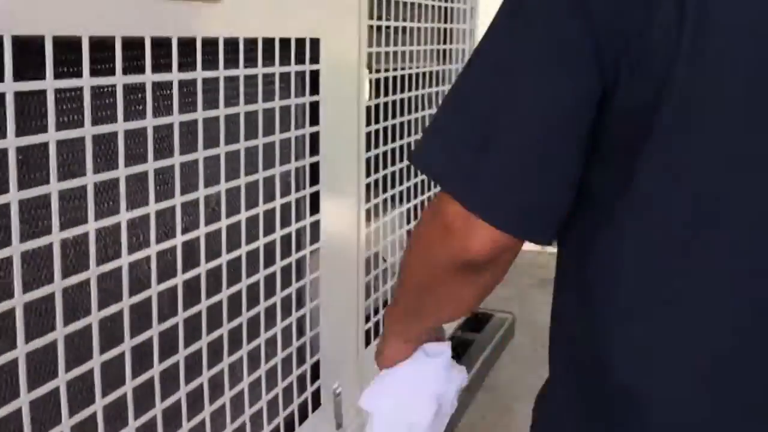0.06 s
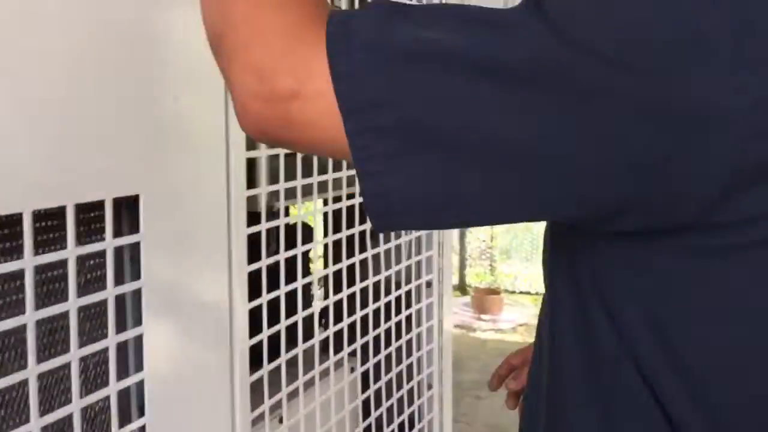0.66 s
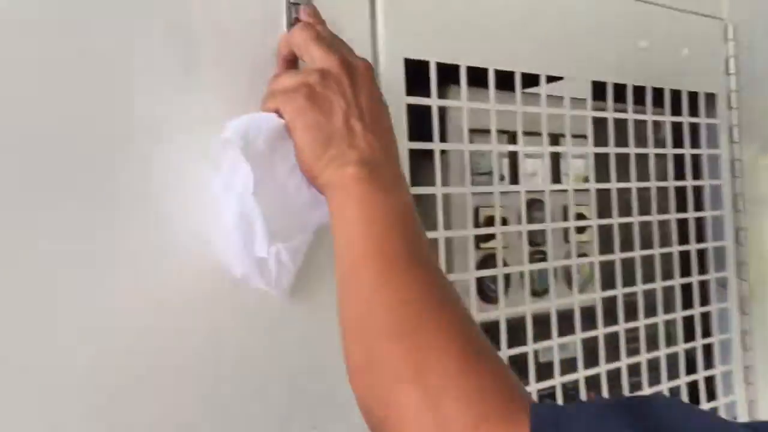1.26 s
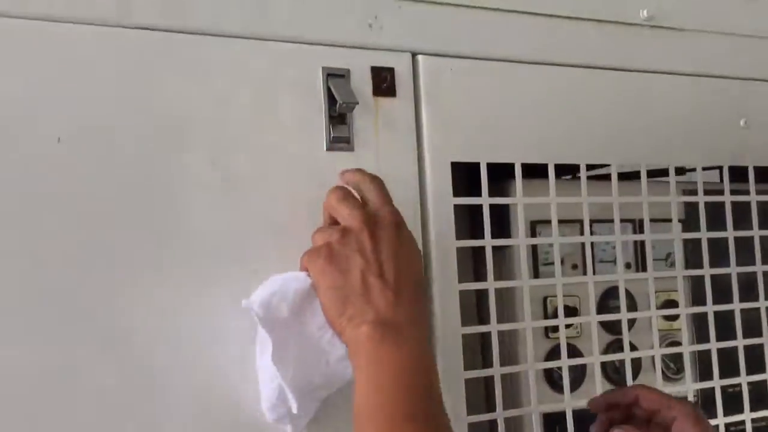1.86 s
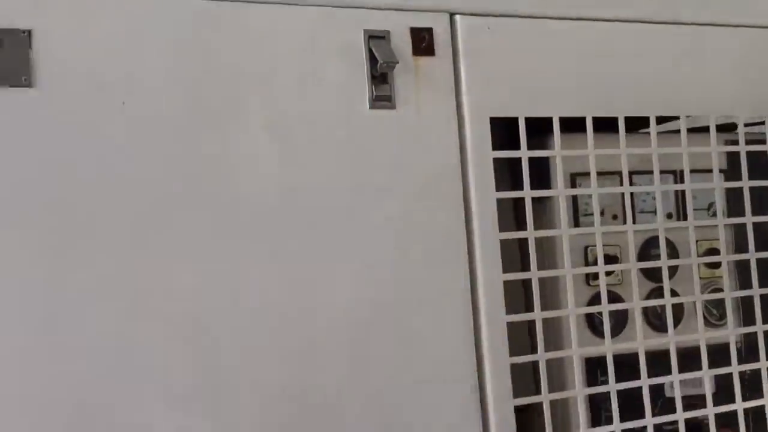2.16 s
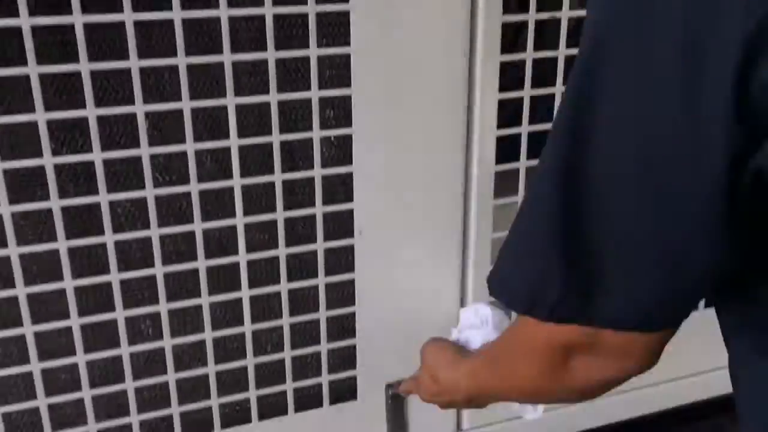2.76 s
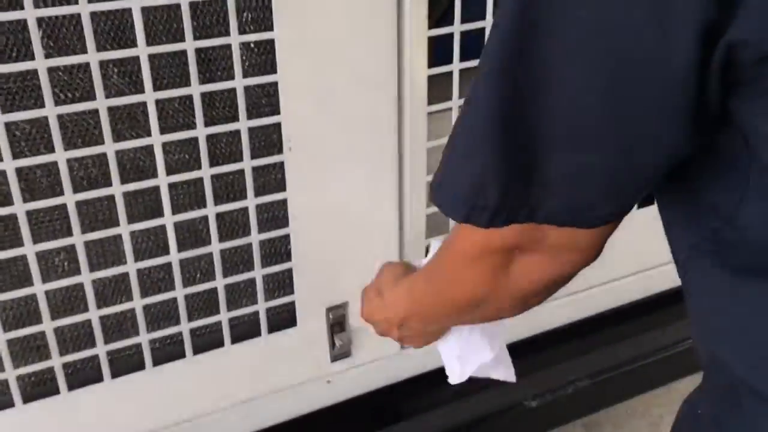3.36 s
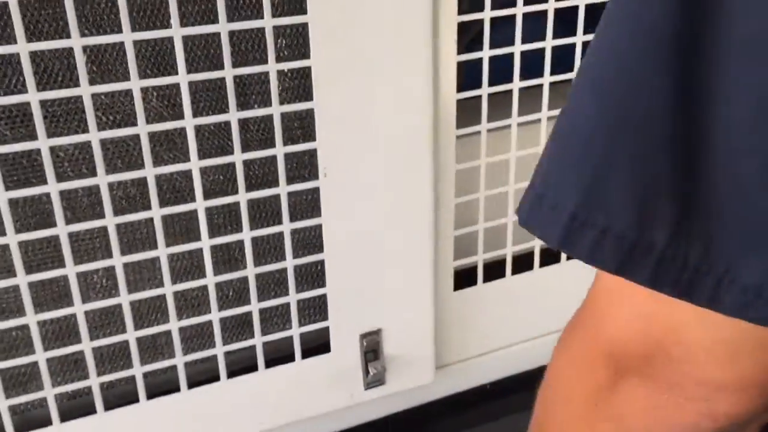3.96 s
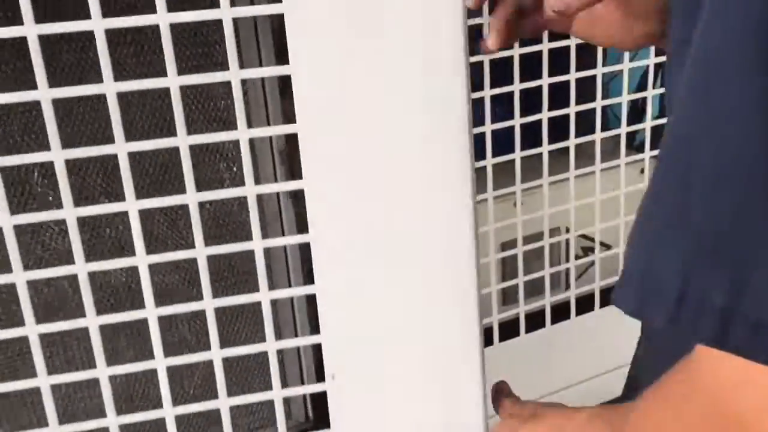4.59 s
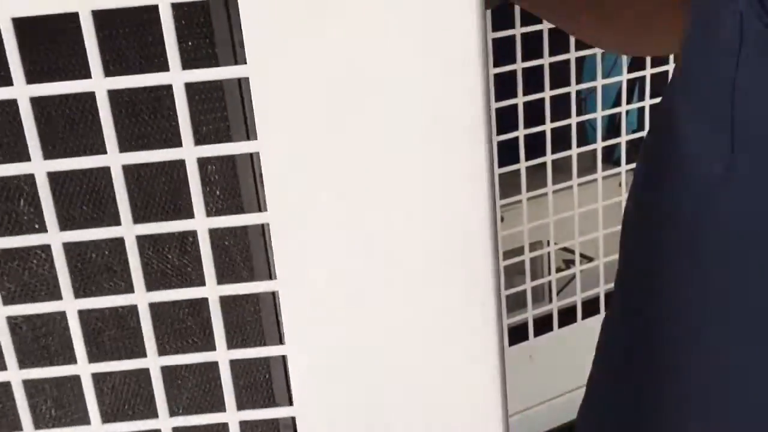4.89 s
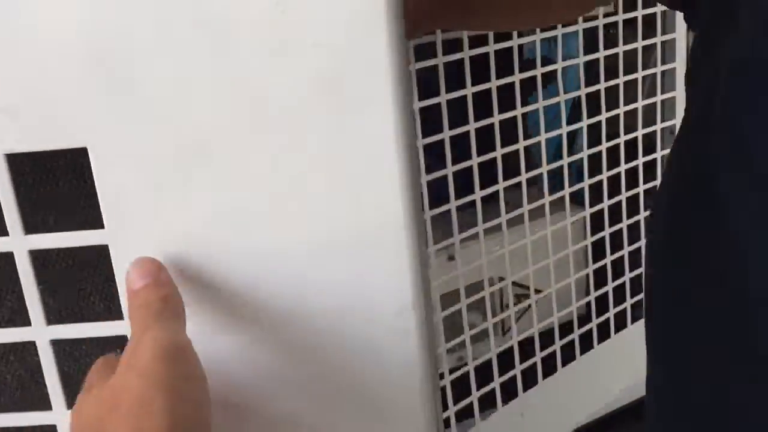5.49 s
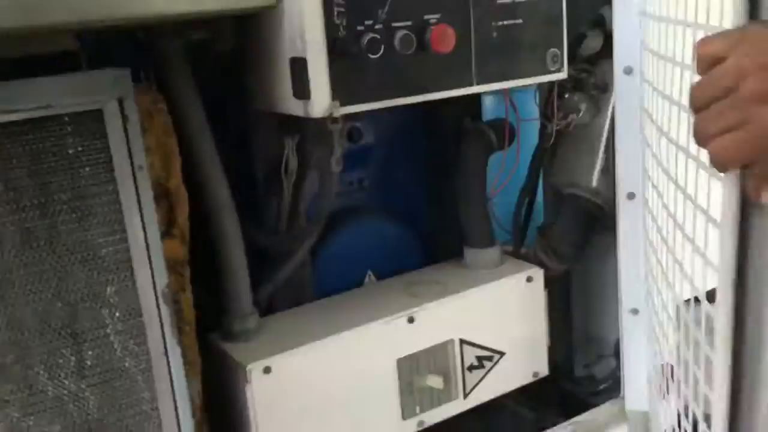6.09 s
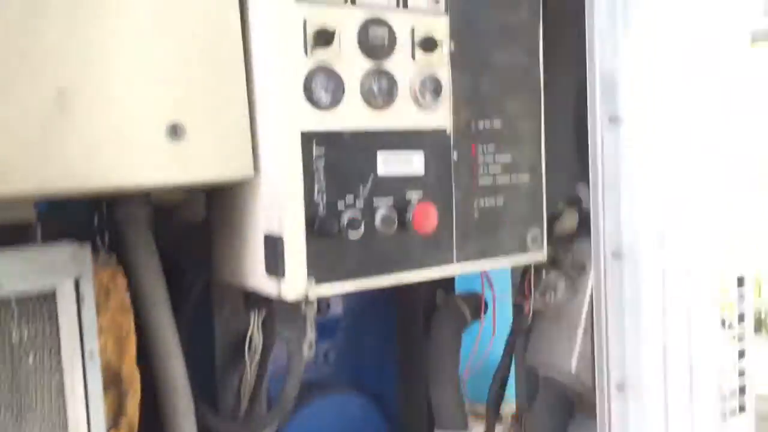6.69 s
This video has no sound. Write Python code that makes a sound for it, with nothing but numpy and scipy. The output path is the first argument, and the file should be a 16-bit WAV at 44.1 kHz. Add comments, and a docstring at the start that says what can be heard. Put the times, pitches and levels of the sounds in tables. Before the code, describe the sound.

A large air-conditioning unit hums while two metal latches clack loudly and its sheet-steel door scrapes and knocks open.

```python
"""Opening a steel machine door

Outdoors under a canopy, a big air-conditioning unit hums low. Thin, high tones, probably insects, waver
in the background. Two spring latches on the unit's sheet-steel door are popped: each snaps open, hits
its stop and clacks back, and the door booms and rings. Then the door is dragged out of its frame and
swung aside, while shoes scuff and cloth rustles."""
import sys
import numpy as np
from scipy import signal
from scipy.fft import rfft, irfft
from scipy.io import wavfile
from scipy.ndimage import uniform_filter1d

SR = 44100
rng = np.random.default_rng(int(sys.argv[2]) if len(sys.argv) > 2 else 0)


def unload_wav(signal):
    """Save mono or channel-first audio to the path in sys.argv[1] as 16-bit WAV at rate SR, clipped to [-1, 1]."""
    wavfile.write(
        sys.argv[1],
        SR,
        np.round(np.clip(np.atleast_2d(signal).T, -1, 1) * 32767).astype(np.int16),
    )


N = 297234


def amp(db):
    """Turns decibels into a gain."""
    return 10 ** (np.asarray(db) / 20)


def unit(x):
    """Scales a signal to an average (rms) level of 1."""
    return x / np.sqrt(np.mean(x ** 2) + 1e-20)


def read(points, hz, column=1):
    """One column of a pitch table, filled in between its rows."""
    table = np.array(points, float)
    return np.interp(np.log(hz + 1), np.log(table[:, 0]), table[:, column])


def curve(rows):
    """The columns of a time table at every sample."""
    times, *columns = np.transpose(rows)
    return np.squeeze([np.interp(np.arange(N) / SR, times, column) for column in columns])


def add(mix, start_s, sound):
    """Mixes a sound in at a given time."""
    part = mix[max(round(start_s * SR), 0):][:len(sound)]
    part += sound[:len(part)]


def peak(hz, centre_hz, db, octaves=0.41):
    """A broad hill in the spectrum, in dB."""
    return db * np.exp(-(np.log2((hz + 1) / centre_hz) / octaves) ** 2)


def colour(x, points, peak_hz=1000, peak_db=0):
    """Shapes a signal's lows and highs from a table, with an optional broad peak."""
    hz = np.fft.rfftfreq(len(x), 1 / SR)
    return unit(irfft(rfft(x) * amp(read(points, hz) + peak(hz, peak_hz, peak_db)), len(x)))


def lowpass(x, top_hz, order):
    """Keeps the lows; a higher order cuts more steeply."""
    return signal.sosfilt(signal.butter(order, top_hz, fs=SR, output="sos"), x)


def resonate(x, hz, width_hz):
    """Lets a signal ring around one pitch."""
    r = np.exp(-np.pi * width_hz / SR)
    return 2 * signal.lfilter([1 - r], [1, -r * np.exp(2j * np.pi * hz / SR)], x).real


def band(size, hz, width_hz):
    """Noise gathered around one pitch."""
    f = np.fft.rfftfreq(size, 1 / SR)
    return unit(irfft(rfft(rng.standard_normal(size)) / (1 + ((f - hz) / (width_hz * .78)) ** 2), size))


def wander(rate_hz):
    """A smooth random drift around zero."""
    f = np.fft.rfftfreq(N, 1 / SR)
    return unit(irfft(rfft(rng.standard_normal(N)) * np.exp(-(f / rate_hz) ** 2) * (f > 0), N))


def tone(hz):
    """A pure tone that follows a pitch curve."""
    return unit(np.sin(2 * np.pi * np.cumsum(hz) / SR))


def dying(t60):
    """A fade 1.5 s long; t60 is the seconds it takes to fall by 60 dB."""
    return np.exp(-np.log(1000) * np.arange(3 * SR // 2) / SR / t60)


# The sound of the machine and the outdoor air: pitch_hz, level_db
AIR_COLOUR = [(20, -37), (40, -14), (76, 0), (125, -7), (220, -12.5), (400, -21.5), (560, -25.5),
              (1300, -30), (1880, -27), (2150, -29), (2900, -35.5), (3250, -38.5), (3800, -38),
              (4700, -46.5), (8000, -52.5), (15500, -61.5)]
# How the low hum swells: time_s, gain_db
HUM_SWELL = [(0, 2), (.8, 1), (1.3, -1.5), (1.9, -1.5), (3.1, 1), (4.7, 2.5), (5.7, 6), (6.1, 2)]


def hum(air_db=-42.5, hum_top_hz=300):
    """The machine's low hum swells and sinks under a steady, soft hiss."""
    air = amp(air_db) * colour(rng.standard_normal(N), AIR_COLOUR)
    low = lowpass(air, hum_top_hz, order=2)
    hiss = air - low
    return low * amp(curve(HUM_SWELL)) + hiss


# Where the machine whirs: pitch_hz, width_hz, level_db
WHIRS = [(950, 80, -68), (1900, 110, -58.5), (2873, 110, -68)]


def whir(waver_db=2):
    """The machine's resonances whir unevenly, each a narrow band of noise."""
    return sum(amp(db + waver_db * wander(8)) * band(N, hz, width) for hz, width, db in WHIRS)


# Thin, high tones in the outdoor background, probably insects: pitch_hz, level_db
HIGH_TONES = [(1815, -63.5), (3505, -69), (5216, -85.5), (6417, -86.5)]
# How they swell together: time_s, gain_db
HIGH_TONE_SWELL = [(0, -7), (1.1, 2), (2.35, -6), (2.6, 3.5), (4.9, 0.5), (5.1, 2), (6.7, -25)]


def high_tones(pitch_jitter=.0025, waver_db=1.66):
    """Thin, high background tones, probably insects, waver in pitch and loudness."""
    out = np.zeros(N)
    for hz, db in HIGH_TONES:
        level = amp(db + waver_db * (wander(25) + wander(4.4)))
        out += level * tone(hz * (1 + pitch_jitter * wander(40)))
    return out * amp(curve(HIGH_TONE_SWELL))


# The path of the machine's low drone: time_s, pitch_hz, level_db
DRONE = [(0, 156, -47), (.3, 154.2, -43.5), (.5, 140.2, -54.5), (.9, 141.4, -66), (1.2, 142, -75)]


def drone(waver_db=2):
    """A low tone from the machine sags and fades."""
    hz, db = curve(DRONE)
    return amp(db + waver_db * wander(18)) * tone(hz)


def friction(points, slips_per_s, spread_db, clump_db, ring_db, ring_t60, slip_t60=0.0044):
    """Rubbing is many tiny, uneven slips that come in clumps, each with a soft ring after it."""
    size_db = spread_db * np.minimum(rng.exponential(1, N), 4) + clump_db * wander(51)
    size = amp(size_db) * rng.standard_normal(N)
    slips = size * (rng.random(N) < slips_per_s / SR)
    fades = dying(slip_t60), dying(ring_t60)
    burst, ring = (unit(fade * rng.standard_normal(len(fade))) for fade in fades)
    return colour(signal.fftconvolve(slips, burst + amp(ring_db) * ring)[:N], points)


def stroke(start_s, length_s, rise_s, fade_db_per_s):
    """The loudness of one rub: it rises, holds, then fades."""
    t = np.maximum(np.arange(N) / SR - start_s, 0)
    return np.minimum(t / rise_s, 1) * amp(-fade_db_per_s * np.maximum(t - length_s, 0))


# Each sweep of sleeve or rag: start_s, length_s, level_db
RUSTLES = [(0, .14, -57), (0.405, 0.089, -51.5), (0.724, 0.1, -61), (.87, .21, -56), (4.21, 0.18, -46.5),
           (4.439, 0.054, -41.5), (4.663, 0.027, -50.5), (4.778, 0.034, -48.5), (5.336, 0.086, -48.5),
           (5.587, 0.029, -38), (5.782, 0.023, -48.5), (5.97, 0.18, -48.5), (6.394, 0.054, -54),
           (6.604, 0.024, -45.5)]
# The sound of rubbing cloth: pitch_hz, level_db
RUSTLE_COLOUR = [(1000, 9.5), (3500, 6), (7500, 3.5), (10400, -1), (12500, 1), (15500, -9)]


def cloth(rise_s=.018, fade_db_per_s=182):
    """Sleeve and rag rustle with each move of the arm."""
    level = sum(amp(db) * stroke(start, length, rise_s, fade_db_per_s) for start, length, db in RUSTLES)
    rustle = friction(RUSTLE_COLOUR, slips_per_s=1400, spread_db=-1, clump_db=3,
                      ring_db=-1, ring_t60=0.28)
    return level * rustle


# Each scuff of a shoe on concrete: start_s, length_s, level_db, rasp_hz
SCUFFS = [(0.04, 0.044, -46, 2900), (0.386, .08, -49, 1380), (0.704, .06, -52.5, 2210),
          (5.963, 0.036, -45, 3160), (6.147, 0.046, -46, 2500), (6.303, 0.059, -38, 2000),
          (6.608, 0.046, -37.5, 1750)]
# The sound of grit under a shoe: pitch_hz, level_db
GRIT_COLOUR = [(150, -9), (550, -2.5), (1100, 5), (1500, -5.5), (2200, 0), (3200, 3), (5500, -6),
               (8000, -26), (15500, -28)]


def shoes(rasp_db=2, rasp_width_hz=1200, rise_s=0.02, fade_db_per_s=157):
    """Soles grind over grit, each scuff with its own rasp."""
    grit = friction(GRIT_COLOUR, slips_per_s=2500, spread_db=4, clump_db=3.5,
                    ring_db=4.5, ring_t60=0.097)
    out = np.zeros(N)
    for start_s, length_s, db, hz in SCUFFS:
        rasp = unit(resonate(resonate(grit, hz, rasp_width_hz), hz, rasp_width_hz))
        level = amp(db) * stroke(start_s, length_s, rise_s, fade_db_per_s)
        out += level * unit(grit + amp(rasp_db) * rasp)
    return out


# The sound of steel hitting steel: pitch_hz, level_db
CRACK_COLOUR = [(150, -25), (900, -3.5), (2000, -4), (3200, -1), (6500, 0), (8500, -1.5), (10400, -5),
                (11800, -0.5), (15500, -4)]


def crack(t60, peak_hz, peak_db, tilt_db_per_octave=0):
    """Small steel parts meet in a short, bright burst of noise."""
    fade = dying(t60)[:SR // 5]
    tilted = [(hz, db + tilt_db_per_octave * np.log2(hz)) for hz, db in CRACK_COLOUR]
    return fade * colour(rng.standard_normal(len(fade)), tilted, peak_hz, peak_db)


# The steel's ring and its tail under the canopy: pitch_hz, level_db, ring_t60_s, tail_t60_s
STEEL_RING = [(70, -28, .4, 1.3), (140, -11.5, 0.52, 1.3), (287, -5, 0.95, 0.73), (470, -10, 0.15, 2.1),
              (930, -2.5, 0.4, 1.2), (1900, -5.5, 0.34, 1.1), (2800, -2.5, 0.26, .75),
              (4000, -3, 0.25, .65), (6400, -7.5, 0.09, 0.75), (7240, -8, 0.1, 0.53), (9500, -8, 0.13, 0.5),
              (10300, -14, 0.098, 0.38), (11400, -13.5, 0.14, 0.57), (15500, -22.5, .12, .42)]


def steel(clang_hz, clang_db, tilt_db_per_octave=0, tail_db=-17, uneven_db=2.5):
    """Sheet steel rings at so many close pitches that they blur into noise, with a softer tail."""
    hz, t, noise = signal.stft(rng.standard_normal(SR), SR, nperseg=512, noverlap=384)
    ripple = uneven_db * rng.standard_normal(len(hz)) * np.minimum(hz / 2000, 1)
    tilt = tilt_db_per_octave * np.log2(np.maximum(hz, 500))
    shape = unit(amp(read(STEEL_RING, hz) + ripple + peak(hz, clang_hz, clang_db) + tilt))
    ring, tail = (np.exp(-np.log(1000) * t / read(STEEL_RING, hz, k)[:, None]) for k in (2, 3))
    ringing = noise * shape[:, None] * np.hypot(ring, amp(tail_db) * tail)
    return signal.istft(ringing, SR, nperseg=512, noverlap=384)[1][:SR]


# The door's strongest notes when hit at each latch: pitch_hz, upper_latch_db, lower_latch_db
DOOR_NOTES = [(131.8, -8, -12), (188.8, -10, -9), (206.3, -7, -7), (248, -10, -11), (269.3, -1, -13.5),
              (282, -2, -6), (298, -7, -12.5), (330, -5, -10.5), (443, 0, -28), (490, -1.5, -24),
              (548, -0.5, -16), (614, 1, -9.5), (645, -10, -10), (685, -2.5, -2.5), (790, -13, -12.5),
              (870, -5.5, -7), (974, -3, 1.5), (1057, -9, -15), (1154, -0.5, -5), (1223, -13.5, -4),
              (1510, -5.5, -12.5), (1705, -3.5, -14.5), (1932, -1, -7.5), (2030, -3.5, 1), (3440, -4, -2.5),
              (3610, -7.5, 1), (4220, -4, -6), (4500, -14.5, -1), (5670, -5.5, -17.5)]


def door_boom(spot, spread_db=1, swell_s=0.00067):
    """The door is hit between the upper latch (spot 0) and the lower (1); high notes die sooner."""
    t = np.arange(len(dying(1))) / SR
    notes = np.zeros(len(t))
    for hz, upper_db, lower_db in DOOR_NOTES:
        db = np.interp(spot, [0, 1], [upper_db, lower_db]) + spread_db * rng.standard_normal()
        t60 = min(1.1, .45 * (1000 / hz) ** .55)
        notes += amp(db) * dying(t60) * np.sin(2 * np.pi * (hz * t + rng.random()))
    return notes * (1 - np.exp(-t / swell_s))


# Small knocks of the door and its parts:
# start_s, level_db, boom_db, tilt_db_per_octave, clang_hz, clang_db
KNOCKS = [(0.094, -48, -20, -8, 3680, 20), (0.149, -45.5, -22, -6.5, 2130, 15.5),
          (.7245, -44, -12, -7, 1870, 11.5), (0.9132, -43.5, -24, -2, 9400, 10),
          (.9290, -47, -18, 15, 9000, 8), (.9990, -47.5, -18, -5, 9060, 11),
          (3.6780, -40.5, -20.5, -8, 9000, 7), (4.3022, -42, -10, -3, 4000, 11),
          (4.328, -24.5, -19, 1, 12800, 6.5), (4.3654, -25, -16, 5.5, 12200, -7),
          (4.3690, -29.5, 5, -5.5, 1950, 15.5), (4.445, -39, -16, 4, 9000, 11),
          (4.481, -34, -9, 0, 1200, 6), (4.505, -41, -17, -10, 2100, 24), (4.6847, -46, -11, 7, 6000, 7),
          (4.8165, -46, 8, 2, 9000, 9), (5.3732, -37.5, 5, -3, 902, 13), (5.4259, -27.5, -19, 4, 9100, 5),
          (5.467, -34.5, -16, 4, 8900, 8), (5.599, -27, -8, 2, 7000, -1.5),
          (5.719, -42, -24, -4.5, 4150, 8), (6.309, -49, -20, -3, 2180, 14)]


def knocks(ring_db=-6, tick_db=7, door_db=-21, tick_t60=0.031):
    """Each light touch makes a short tick, with a little ring and boom."""
    out, boom = np.zeros(N), door_boom(spot=0.97)
    for start_s, db, boom_db, tilt, clang_hz, clang_db in KNOCKS:
        add(out, start_s, amp(db + tick_db) * crack(tick_t60, clang_hz, clang_db, tilt))
        # a brighter tick comes from a smaller part, which rings the sheet less
        add(out, start_s, amp(db + ring_db - 0.35 * tilt) * steel(clang_hz, clang_db, tilt))
        add(out, start_s, amp(db + boom_db + door_db) * boom)
    return out


# Each blow of a latch: start_s, spot (0 to 1), level_db, boom_db, clang_hz, clang_db, crack_db, ring_db
LATCH_BLOWS = [(1.5442, 0.24, -21.5, -9, 3500, -7.5, -7, -14.5), (1.5475, 0.054, -7.5, 2, 3080, 1, 2.5, -2),
               (1.5886, 0.52, -13, 6, 2800, 3.5, 1, -11), (1.811, 0.68, -10.5, 5.5, 2900, -5, 5.5, -2.5),
               (3.2360, 0.85, -18, -17, 3540, -9.5, 5.5, -9.5), (3.2379, 0.91, -9, 4.5, 980, 3.5, 6.5, -11),
               (3.2478, 0.89, -15, -8.5, 4100, 13, 10.5, -13.5),
               (3.2716, 0.25, -15, -2.5, 3200, 0.5, 5, 1.5), (3.452, 0.7, -13, 3, 3400, -6, 8, 4.5),
               (3.4585, 0.95, -26, 1.5, 5500, 4.5, 18, -8.5),
               (3.4749, 0.92, -17, 10, 4000, -10.5, -24, -8.5)]
# Where the spring lever rings: pitch_hz, width_hz, level_db
LEVER_RING = [(1970, 370, 3), (5800, 440, -3), (6410, 450, 1.5)]


def latches(door_db=-20.5, lever_db=-6, lever_t60=.16, lever_tail_db=-21, lever_tail_t60=.7,
            crack_t60=0.032, chatter_db=1.6, chatter_t60=0.53):
    """Each blow cracks, rings the spring lever and sets the whole door sounding."""
    out = np.zeros(N)
    lever_fade = np.hypot(dying(lever_t60), amp(lever_tail_db) * dying(lever_tail_t60))
    for start_s, spot, db, boom_db, clang_hz, clang_db, crack_db, ring_db in LATCH_BLOWS:
        lever = sum(amp(level) * band(len(lever_fade), hz, width) for hz, width, level in LEVER_RING)
        # while the door still shakes hard, loose parts chatter against it
        shake = unit(uniform_filter1d(rng.standard_normal(SR), size=110))
        chatter = amp(chatter_db * shake * dying(chatter_t60)[:SR])
        add(out, start_s, amp(db) * chatter * steel(clang_hz, clang_db))
        add(out, start_s, amp(db + crack_db) * crack(crack_t60, clang_hz, clang_db))
        add(out, start_s, amp(db + ring_db + lever_db) * lever * lever_fade)
        add(out, start_s, amp(db + boom_db + door_db) * door_boom(spot))
    return out


def rubbing(move):
    """How hard the door rubs during one move; it is silent before and after."""
    t = np.arange(N) / SR
    return amp(curve(move)) * (t > move[0][0]) * (t < move[-1][0])


# The door's edge rubbing as it is pulled out: time_s, level_db
PULL = [(4.18, -65), (4.23, -44.5), (4.39, -33.5), (4.44, -39), (4.51, -33), (4.56, -37), (4.64, -53.5),
        (4.9, -68)]
# And as it is swung aside: time_s, level_db
SWING = [(5.32, -63), (5.38, -38), (5.54, -43.5), (5.62, -40), (5.68, -47), (5.85, -49), (6.1, -44.5),
         (6.3, -53.5), (6.74, -47)]
# The sound of the dragging edge: pitch_hz, level_db
DRAG_COLOUR = [(90, -14.5), (270, 5.5), (450, 1), (800, 0), (1250, 0), (1700, -4.5), (1980, 2), (2400, -5),
               (4500, -10), (7000, -12), (10500, -18.5), (15500, -17)]


def door_drag(wobble_db=-2.5, wobble_top_hz=360, wobble_lag_s=0.15):
    """The door's edge drags in its frame, and the rubbing sets the loose sheet wobbling."""
    effort = rubbing(PULL) + rubbing(SWING)
    scrape = friction(DRAG_COLOUR, slips_per_s=1500, spread_db=1, clump_db=0.54,
                      ring_db=-3, ring_t60=0.13)
    # slow pushes stir only the door's lowest notes, which take time to build up and to settle
    sway = signal.fftconvolve(rng.standard_normal(N), door_boom(spot=0.49) * dying(0.1))[:N]
    wobble = unit(lowpass(sway, wobble_top_hz, order=4))
    keep = np.exp(-1 / (wobble_lag_s * SR))
    built_up = np.sqrt(signal.lfilter([1 - keep], [1, -keep], effort ** 2))
    return effort * scrape + amp(wobble_db) * built_up * wobble


def door_bump(start_s=5.561, level_db=-30.5, hollow_hz=307, hollow_db=6, hollow_t60=.13,
              swell_s=0.0026, thud_db=-1, thud_top_hz=1800, thud_t60=0.26):
    """The door's broad face is bumped as it comes free: one hollow note and a dull thud."""
    out, t = np.zeros(N), np.arange(len(dying(1))) / SR
    hollow = np.sin(2 * np.pi * hollow_hz * t) * (1 - np.exp(-t / swell_s)) * dying(hollow_t60)
    thud = unit(lowpass(rng.standard_normal(len(t)), thud_top_hz, order=8)) * dying(thud_t60)
    add(out, start_s, amp(level_db) * (amp(hollow_db) * hollow + amp(thud_db) * thud))
    return out


def scene():
    """The outdoor background, the person and the door, mixed into one channel."""
    background = hum() + whir() + high_tones() + drone()
    person = cloth() + shoes()
    door = knocks() + latches() + door_drag() + door_bump()
    return (background + person + door)[None]


def record(dry, ceiling=0.82, knee=4, top_hz=15400):
    """Rounds off the loudest peaks, then cuts the very highest treble."""
    rounded = dry / (1 + abs(dry / ceiling) ** knee) ** (1 / knee)
    treble_cut = signal.firwin(401, top_hz, window=("kaiser", 8), fs=SR)
    return signal.oaconvolve(rounded, treble_cut[None], "same")


dry = scene()
out = record(dry)
unload_wav(out)
```